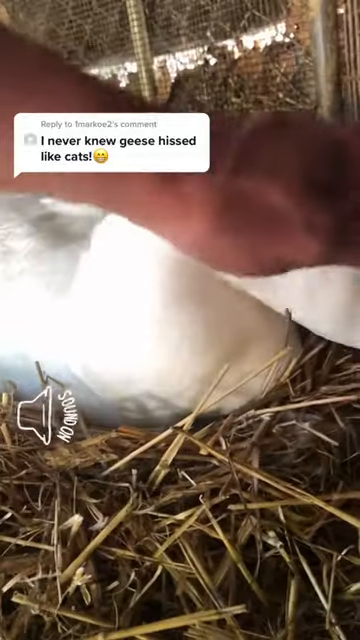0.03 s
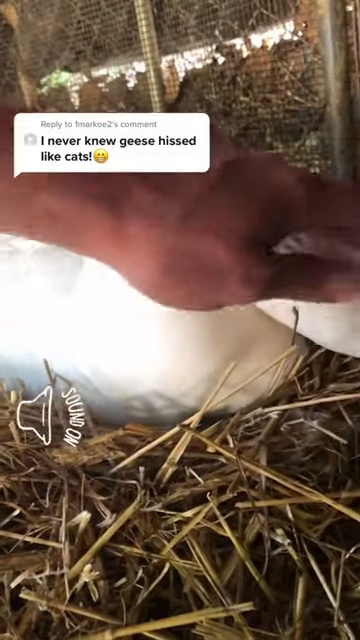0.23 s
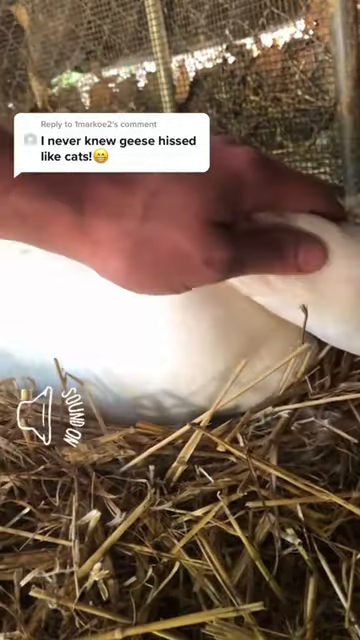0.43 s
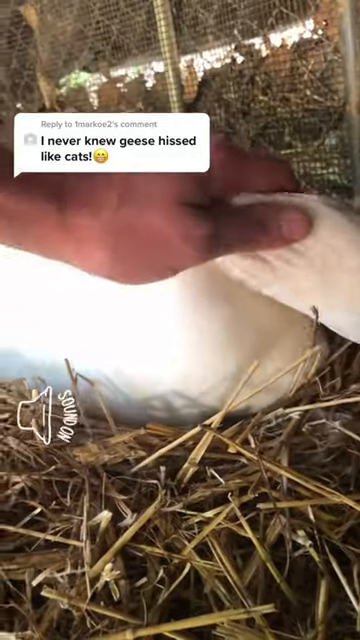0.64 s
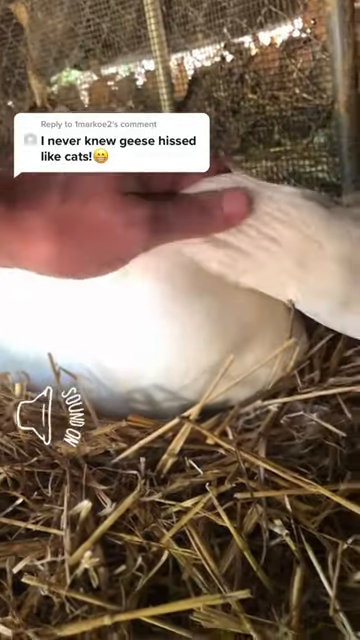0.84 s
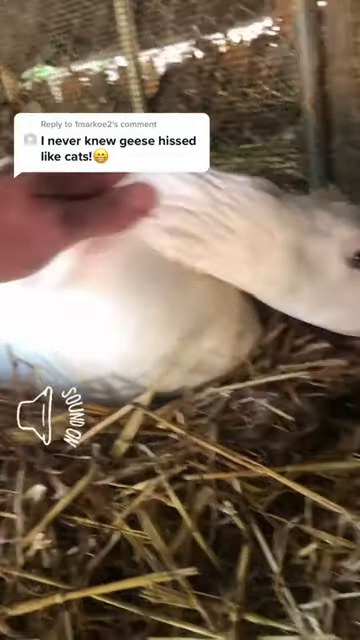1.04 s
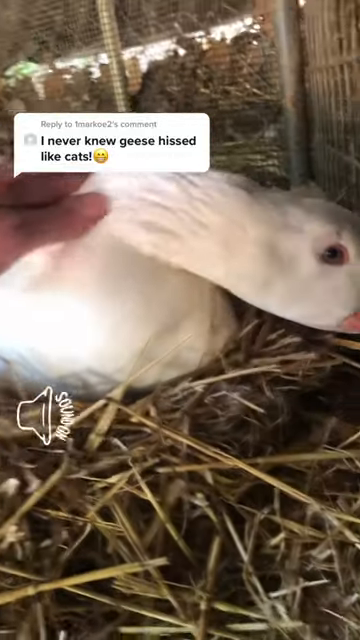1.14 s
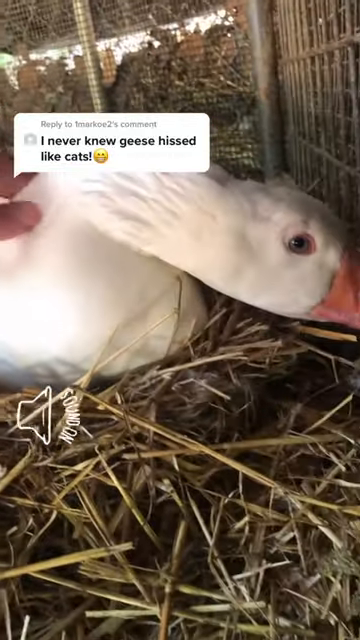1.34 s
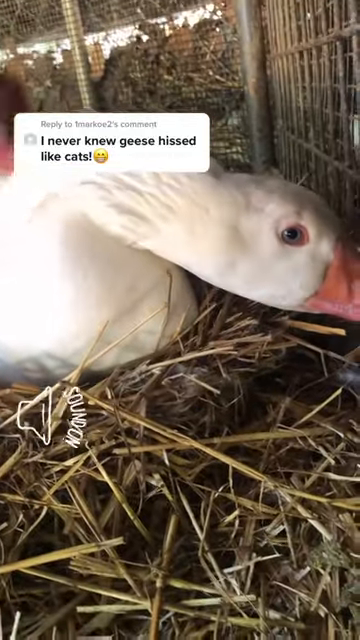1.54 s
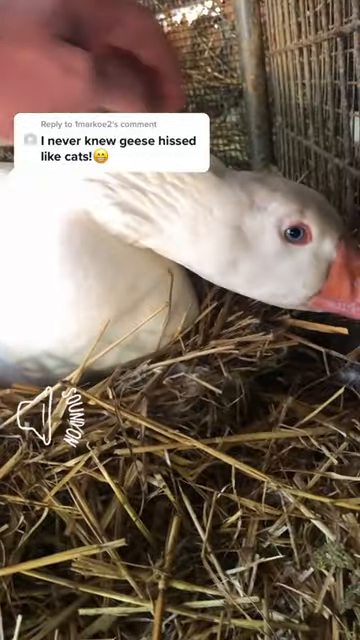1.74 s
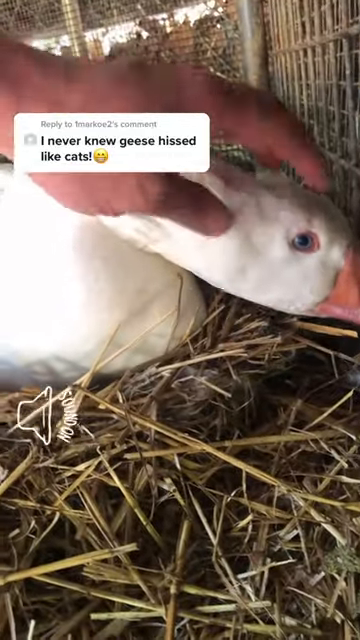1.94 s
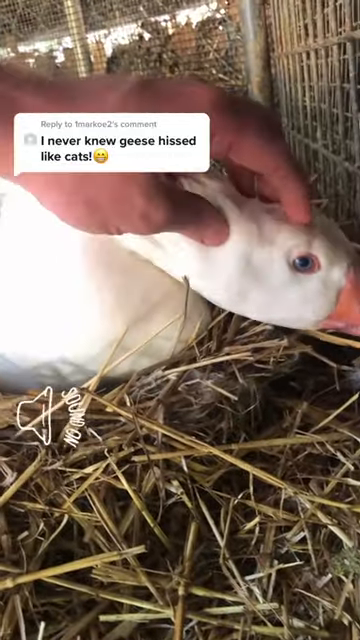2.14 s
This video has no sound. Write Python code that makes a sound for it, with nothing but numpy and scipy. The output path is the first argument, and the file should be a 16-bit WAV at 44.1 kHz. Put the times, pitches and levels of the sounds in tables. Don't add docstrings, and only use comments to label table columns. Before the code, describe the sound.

A goose close to a phone microphone honks at about 0.2 seconds, low, harsh and buzzing, breaking near 0.45 into a hiss that dies away. From 0.8 to 1.3 it draws a raspy, whistling breath. A hollow bill tick at 1.56 opens a rougher second honk, ending near 1.9 in another hiss. Low outdoor rumble, thin air and slight pen scatter lie underneath.

```python
import sys
import numpy as np
from scipy import signal
from scipy.fft import rfft, irfft
from scipy.io import wavfile
from scipy.ndimage import uniform_filter1d

SR = 44100
rng = np.random.default_rng(int(sys.argv[2]) if len(sys.argv) > 2 else 0)


def transcribe(u):
    v = np.clip(np.atleast_2d(u).T, -1, 1)
    q = np.round(v * 32767).astype(np.int16)
    wavfile.write(sys.argv[1], SR, q)


def ratio(d):
    e = np.asarray(d, float) / 20
    return 10 ** e


N = 97020

# time in seconds, pitch in Hz, chest tone in dB, voice in dB.
HONK_A = [
    (.19, 132.7, -58, -46.5),
    (.205, 136.6, -55, -37),
    (.24, 143.1, -47, -35),
    (.3, 146.1, -41.5, -35.5),
    (.35, 149.4, -41.5, -31.5),
    (.432, 149.5, -40.5, -30),
    (.46, 151, -42, -34.5),
    (.5, 150, -46, -47),
    (.545, 149.5, -57, -57),
]
HONK_B = [
    (1.566, 140, -66, -40),
    (1.6, 143.7, -48.5, -34.5),
    (1.65, 146.9, -40.5, -37.5),
    (1.7, 147.4, -39.5, -38.5),
    (1.756, 150.7, -39.5, -38),
    (1.78, 150.8, -39.5, -35.5),
    (1.84, 149.3, -41.5, -36),
    (1.899, 149.7, -48.5, -45),
    (1.939, 145, -61, -60),
]


def evened(x):
    return x / np.sqrt(np.mean(x ** 2) + 1e-20)


def levelled(x):
    return x / np.sqrt(abs(uniform_filter1d(x ** 2, size=2600)) + 1e-20)


def noise():
    return rng.standard_normal(N)


def shaped(points):
    f, db = np.transpose(points)
    hz = np.fft.rfftfreq(N, 1 / SR)
    gain = ratio(np.interp(np.log(hz + 1), np.log(f + 1), db))
    return evened(irfft(rfft(noise()) * gain, N))


def resonate(x, hz, width):
    turn = np.exp(2j * np.pi * np.cumsum(hz * np.ones(len(x))) / SR)
    r = np.exp(-np.pi * abs(width) / SR)
    return 2 * (turn * signal.lfilter([1 - r], [1, -r], x / turn + 1e-18)).real


def steep(x, hz, width, second=2):
    return resonate(resonate(x, hz, width), hz, second * width)


def pipe(x, peaks):
    return sum((-1) ** k * ratio(db) * steep(x, hz, width, 3) for k, (hz, width, db) in enumerate(peaks))


def band(x, lo_hz, hi_hz):
    edges = np.clip([lo_hz, hi_hz], 20, 20000)
    return signal.sosfilt(signal.butter(2, edges, "band", fs=SR, output="sos"), x)


def columns(table):
    t, rows = np.arange(N) / SR, np.transpose(table)
    gate = np.clip(np.minimum(t - rows[0, 0], rows[0, -1] - t) / .002, 0, 1)
    return [gate] + [np.interp(t, rows[0], c) for c in rows[1:]]


def rumble():
    # frequency in Hz, level in dB.
    outdoors = [(18, -74), (35, -23), (60, -8), (100, -6.5), (160, -7.5), (340, -23.5), (1300, -28),
                (10000, -51.5)]
    air = shaped(outdoors)
    dip = 0
    for table in (HONK_A, HONK_B):
        gate, _, chest_db, _ = columns(table)
        dip = dip + gate * np.clip((chest_db + 52) / 8, 0, 1)
    return ratio(-52) * (air - dip * resonate(air, 227, 96))


def faint_air():
    # time in seconds, level in dB.
    strength = [(0, -78), (.12, -66), (.3, -79.5), (.8, -72), (1.1, -70.5), (1.31, -68), (1.37, -80),
                (1.55, -88), (2.2, -68)]
    return ratio(columns(strength)[1]) * evened(band(noise(), 1800, 9000))


def flecks():
    # centre in seconds, low edge in Hz, high edge in Hz, level in dB.
    bursts = [
        (.012, 4200, 5200, -74),
        (.012, 8200, 9500, -84),
        (.4, 5100, 6400, -56),
        (.61, 4100, 5200, -57),
        (.61, 7500, 9600, -75),
        (.91, 4200, 5200, -66),
        (.955, 5100, 6300, -67),
        (1.395, 6300, 7600, -74),
    ]
    t, out = np.arange(N) / SR, np.zeros(N)
    for s, lo, hi, db in bursts:
        swell = np.cos(np.pi * np.clip((t - s) / .046, -.5, .5))
        out = out + ratio(db) * swell * shaped([(lo - 30, -80), (lo, 0), (hi, 0), (hi + 30, -80)])
    return out


def pen(x):
    t60_s = .35
    t = np.arange(SR // 2) / SR
    tail = band(rng.standard_normal(len(t)), 340, 5170) * ratio(-60 * t / t60_s)
    tail = tail * (t > .006)
    return signal.fftconvolve(x, tail / np.linalg.norm(tail))[:N]


def small_puffs():
    # start in seconds, length in seconds, level in dB, resonance in Hz.
    puff_rows = [(-.03, 0.23, -63.5, 800), (1.445, 0.11, -62, 1020), (1.45, 0.1, -70, 1550),
                 (1.43, 0.14, -59, 390), (1.45, 0.11, -62.5, 550), (.1, 0.074, -76, 390),
                 (.2, 0.12, -44.5, 874), (.2, 0.063, -44, 1350), (.205, .075, -48.5, 1680),
                 (.44, 0.04, -40, 1720), (.44, 0.047, -37.5, 794), (1.58, .065, -47, 1570),
                 (1.865, .06, -42.5, 607), (1.82, 0.061, -44.5, 2250), (1.82, .14, -51, 4600),
                 (.435, 0.041, -51, 6350)]
    t, out = np.arange(N) / SR, np.zeros(N)
    for s, length, db, hz in puff_rows:
        edge = np.clip(np.minimum(t - s, s + length - t) / 0.023, 0, 1)
        out = out + ratio(db) * edge * evened(steep(noise(), hz, 85))
    return out


def bill_ticks():
    # start in seconds, level in dB, resonance in Hz, width in Hz, decay in seconds.
    tick_rows = [
        (.195, -45, 8550, 4480, 0.0033),
        (1.564, -31, 996, 300, .012),
    ]
    t, out = np.arange(N) / SR, np.zeros(N)
    for s, db, hz, width, decay in tick_rows:
        shape = np.clip((t - s) / 0.0036, 0, 1) * np.exp(-abs(t - s) / decay)
        out = out + ratio(db) * shape * evened(steep(noise(), hz, width, 1))
    return out


def inbreath():
    # time in seconds, level in dB, whistle in Hz.
    breath = [
        (.8, -61.5, 1090),
        (.88, -57, 1200),
        (.97, -52.5, 1290),
        (1.03, -55.5, 1510),
        (1.09, -52.5, 1610),
        (1.14, -53.5, 1670),
        (1.195, -57.5, 1320),
        (1.275, -57.5, 1200),
        (1.3, -76, 1222),
    ]
    # frequency in Hz, width in Hz, level in dB.
    breath_pipe = [(940, 41, -2.5), (1251, 49, 2.5), (1490, 90, -5.5), (1746, 63, -5.5), (1950, 100, -8.5)]
    gate, db, hz = columns(breath)
    flutter = evened(resonate(noise(), 60, 44))
    air = noise() * (1 + .35 * flutter)
    whistle = steep(air, hz, 80)
    fixed = band(pipe(air, breath_pipe), 880, 2340)
    return gate * ratio(db) * evened(evened(fixed) + ratio(-1) * levelled(whistle))


def hiss():
    # time in seconds, level in dB.
    outbreath = [(0.19, -51), (0.2, -92), (0.21, -52), (0.38, -44.5), (0.432, -44), (0.455, -37.5),
                 (0.51, -43.5), (0.58, -50), (0.88, -61), (1.25, -65.5), (1.27, -63), (1.39, -87),
                 (1.55, -71), (1.58, -53), (1.805, -46.5), (1.83, -41), (1.9, -45.5), (2.2, -59)]
    # frequency in Hz, width in Hz, level in dB.
    hiss_pipe = [(870, 63, -4.5), (1050, 79, 0), (1209, 22, 4), (1477, 56, -0.5), (1793, 31, 0),
                 (2086, 37, 1.5), (2370, 145, -2.5), (2697, 18.4, 3), (2982, 78, 2), (3344, 46, 0),
                 (3696, 210, -7), (4040, 140, -4.5), (4470, 320, -4), (6220, 81, -25)]
    # frequency in Hz, level in dB.
    hiss_air = [(300, -22), (500, -9), (1100, -10.5), (2300, -6.5), (4500, -9), (5200, -12.5),
                (6400, -14.5), (6800, -21.5), (9800, -29), (10400, -82)]
    gate, db = columns(outbreath)
    below_peak_db = db - db.max()
    air = noise()
    upper = ratio(0.28 * below_peak_db) * pipe(air, hiss_pipe[7:])
    tones = evened(pipe(air, hiss_pipe[:7]) + upper)
    flicker = evened(uniform_filter1d(noise(), size=500))
    broad = ratio(.5 * below_peak_db) * shaped(hiss_air)
    return gate * ratio(db - 0.5 * flicker) * (ratio(1.5) * tones + ratio(4) * broad)


def glides():
    # start in seconds, length in seconds, from Hz, to Hz, level in dB.
    slides = [
        (.47, .075, 570, 385, -43),
        (.2, .11, 700, 745, -46),
        (.295, .08, 740, 880, -45),
        (.46, .06, 950, 700, -46),
        (.2, .06, 430, 480, -51),
        (1.83, .11, 545, 355, -45),
        (1.575, .23, 712, 778, -49),
        (1.85, .06, 1000, 800, -49),
    ]
    t, out = np.arange(N) / SR, np.zeros(N)
    for s, length, from_hz, to_hz, db in slides:
        drift = evened(uniform_filter1d(noise(), size=350))
        flutter = evened(uniform_filter1d(noise(), size=350))
        hz = np.interp(t, [s, s + length], [from_hz, to_hz]) * (1 + .005 * drift)
        edge = np.clip(np.minimum(t - s, s + length - t) / .02, 0, 1)
        out = out + edge * ratio(db + 1.6 * flutter) * np.sin(2 * np.pi * np.cumsum(hz) / SR)
    return out


def honk(table, mouth, roughness, peaks):
    jitter, throat_width_hz, split_hz = .02, 65, 2250
    gate, hz, chest_db, voice_db = columns(table)
    _, low_hz, low_db, high_hz, high_db = columns(mouth)
    _, rough, pipe_db, bright_db = columns(roughness)

    wobble = evened(uniform_filter1d(noise(), size=300))
    turns = np.cumsum(hz * (1 + jitter * (rough + 0.041) * wobble)) / SR
    pulses = sum(np.cos(2 * np.pi * (k * turns + .2 * rng.random())) for k in range(2, 44))
    puffs = evened((0.29 + np.exp(-(turns % 1) / 0.36)) * band(noise(), 100, 5500))
    drive = (1 - rough) * evened(pulses) + rough * puffs

    tone_level = .06 * np.clip(.12 - pipe_db / 12, .12, 1)
    throat = 0
    for f, db in ((low_hz, low_db), (high_hz, high_db)):
        tone = np.sin(2 * np.pi * np.cumsum(f * (1 + .5 * jitter * wobble)) / SR)
        throat = throat + ratio(db) * (steep(drive, f, throat_width_hz) + tone_level * tone)

    lower = pipe(drive, [p for p in peaks if p[0] < split_hz])
    upper = pipe(drive, [p for p in peaks if p[0] >= split_hz])
    tube = lower + ratio(bright_db) * upper + ratio(-28) * drive
    voice = band(ratio(pipe_db) * tube - ratio(3) * throat, 260, 4620)

    cycle = 2 * np.pi * np.cumsum(hz) / SR
    chest = np.sqrt(2) * (np.sin(cycle) + ratio(-25) * np.sin(2 * cycle))
    chest = ratio(uniform_filter1d(chest_db, size=900)) * chest
    return gate * (ratio(voice_db) * levelled(voice) + chest)


def first_honk():
    # time in seconds, low resonance in Hz, its dB, high resonance in Hz, its dB.
    mouth = [(.19, 417, -7.5, 720, -3), (0.232, 470, -10.5, 750, -5.5), (0.302, 568, -8, 745, -3),
             (.355, 610, -16, 870, -1), (.41, 607, -19.5, 760, -11), (.46, 642, -17, 930, 1.5),
             (0.484, 535, -10.5, 806, -6), (0.514, 450, -3, 686, -3), (.545, 390, -9, 598.6, -11)]
    # time in seconds, share of noise from 0 to 1, windpipe in dB, its upper resonances in dB.
    roughness = [(.19, .7, -1, 0), (.26, .45, -1, 1), (.32, .28, 0, 2), (.345, .14, 5, 1),
                 (.435, .14, 5, 1), (.45, .7, -10, 11), (.49, .85, -13, 4), (.545, .9, -20, 0)]
    # frequency in Hz, width in Hz, level in dB.
    peaks = [(1062, 76, 4), (1200, 120, -2.5), (1487, 69, -6.5), (1740, 120, -11), (2126, 28, -2),
             (2438, 160, -10.5), (2936, 150, -5.5), (3530, 150, -17.5), (4105, 186, -11), (4630, 90, -15.5),
             (6200, 110, -27)]
    return honk(HONK_A, mouth, roughness, peaks)


def second_honk():
    # time in seconds, low resonance in Hz, its dB, high resonance in Hz, its dB.
    mouth = [(1.565, 430, -3.5, 710, -15), (1.609, 558, -6.5, 800, -12.5), (1.7, 593, -4, 870, -5),
             (1.75, 614.3, -14.5, 905, -4.5), (1.775, 560.5, -18, 1050, 1),
             (1.842, 539.2, -3.5, 1038, -1.5), (1.875, 489, -6, 900, -2), (1.907, 429.4, -4, 752, -4),
             (1.94, 370, -4, 650, -10)]
    # time in seconds, share of noise from 0 to 1, windpipe in dB, its upper resonances in dB.
    roughness = [(1.565, .75, 2, -4), (1.63, .45, 0, 1), (1.66, .21, 0, 3), (1.72, .21, 0, 1),
                 (1.76, .25, 0, -7), (1.83, .35, 0, -6), (1.87, .7, -6, -4), (1.9, .85, -13, 0),
                 (1.945, .9, -18, 0)]
    # frequency in Hz, width in Hz, level in dB.
    peaks = [(900, 97, -15), (1120, 75, 1.5), (1487, 65, -4), (1777, 87, -10), (2176, 60, -18),
             (2650, 105, -4), (2973, 98, -9.5), (3490, 210, -22), (4090, 140, -15.5), (4650, 89, -23)]
    return honk(HONK_B, mouth, roughness, peaks)


def scene():
    goose = first_honk() + second_honk() + glides()
    goose = goose + hiss() + inbreath() + small_puffs() + bill_ticks()
    mid = goose + ratio(-14) * pen(goose) + rumble() + faint_air()
    side = flecks()
    return np.array([mid + side, mid - side])


def top_cut(x):
    return signal.sosfilt(signal.butter(12, 10400, fs=SR, output="sos"), x)


def record(dry):
    lowpass = signal.firwin(181, 10050, window=("kaiser", 9), fs=SR)
    mix = signal.oaconvolve(dry, lowpass[None], "same")
    return top_cut(mix)


dry = scene()
out = record(dry)
transcribe(out)
```